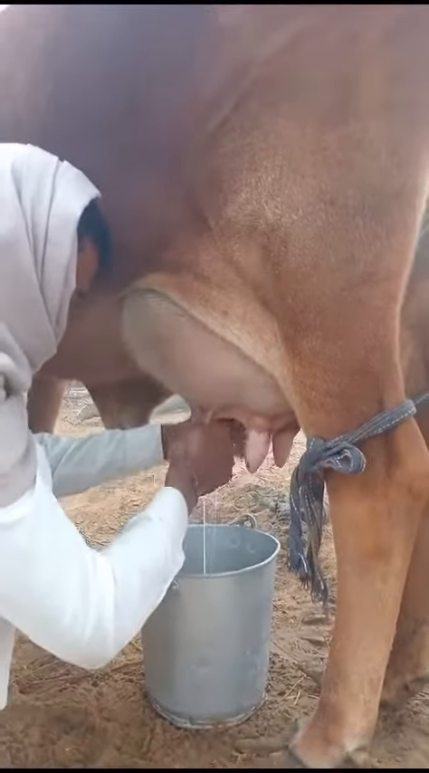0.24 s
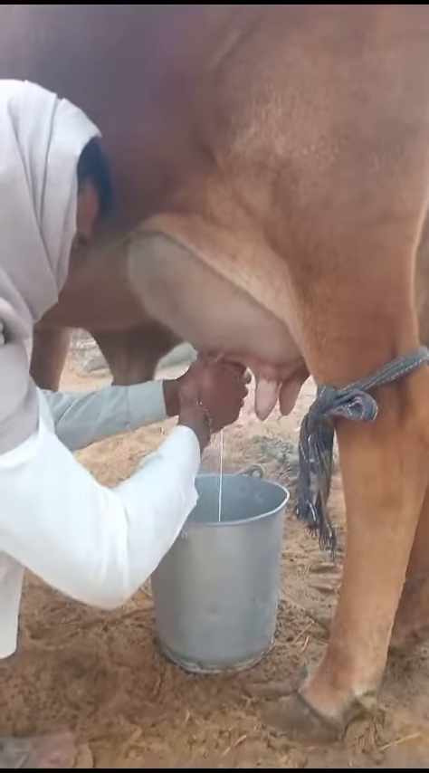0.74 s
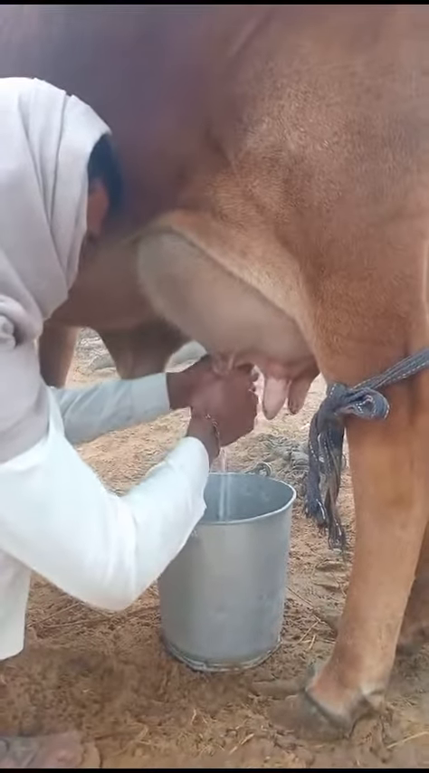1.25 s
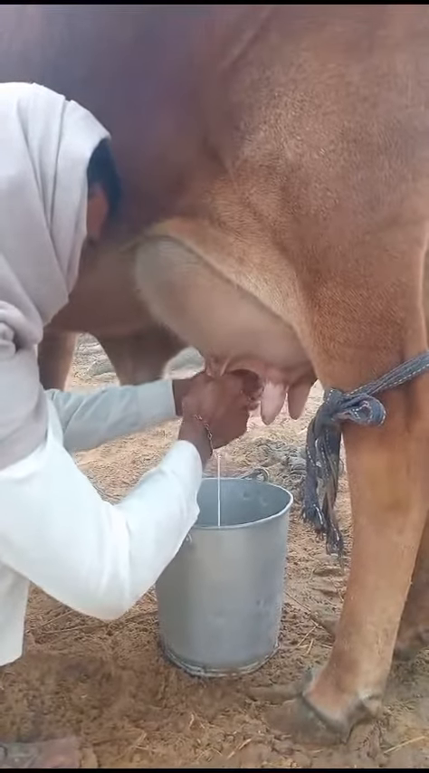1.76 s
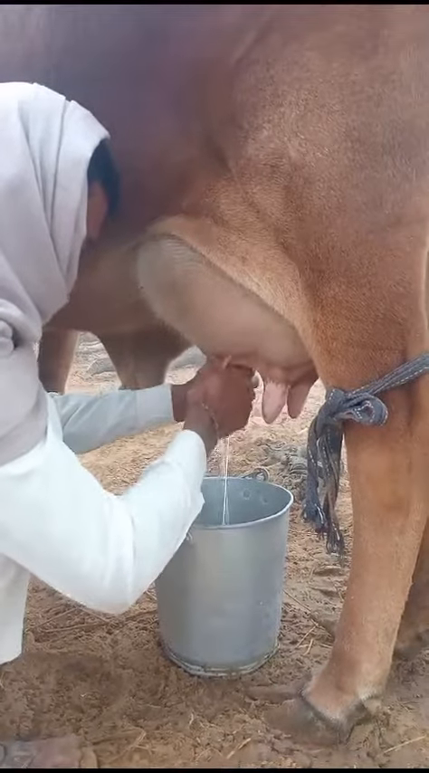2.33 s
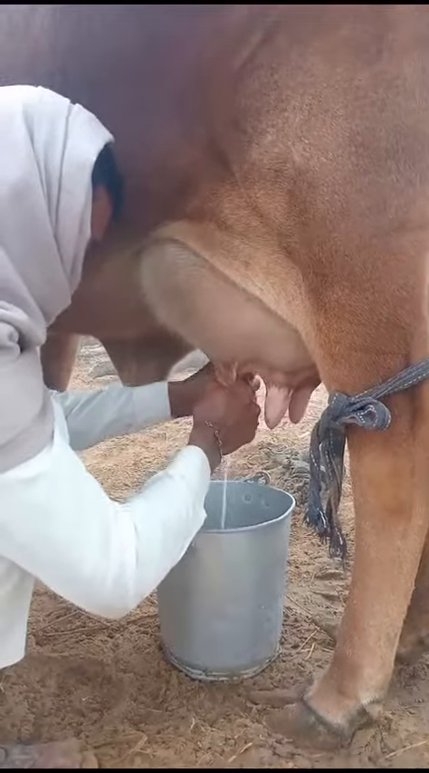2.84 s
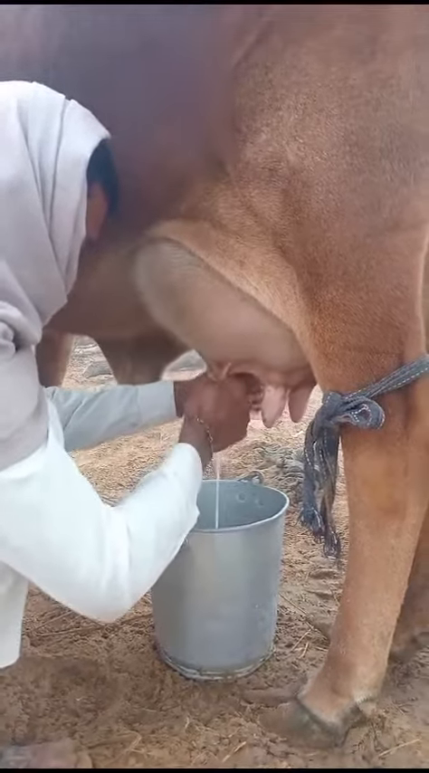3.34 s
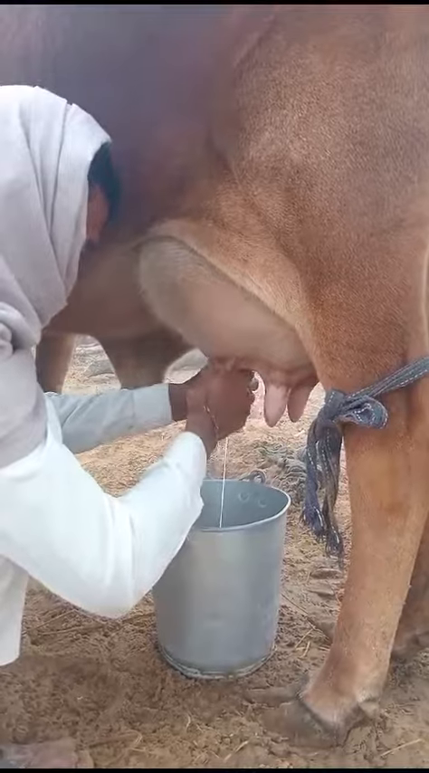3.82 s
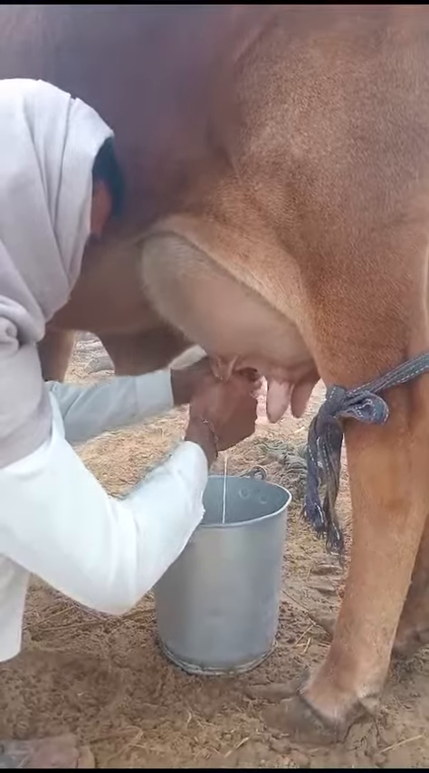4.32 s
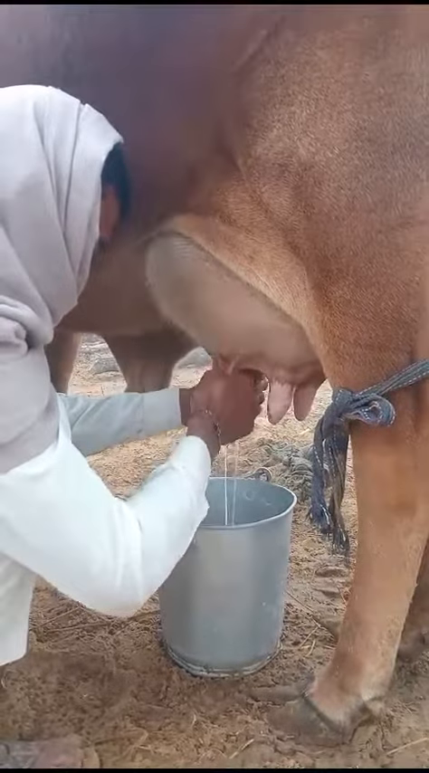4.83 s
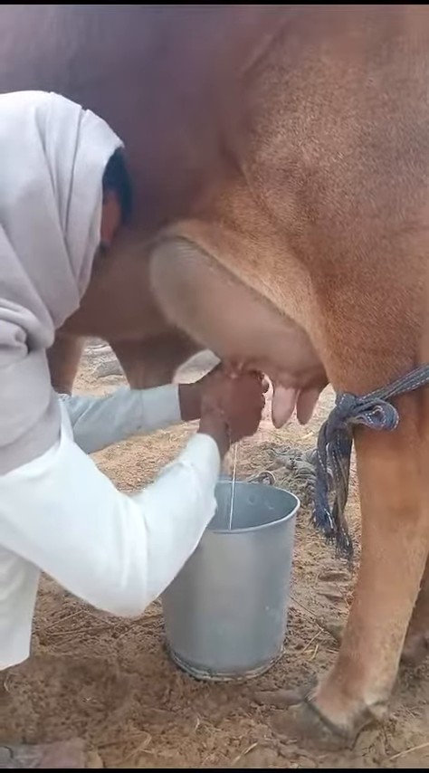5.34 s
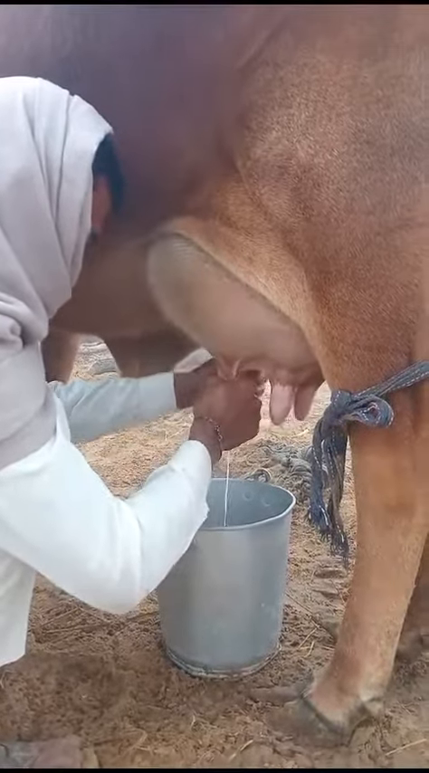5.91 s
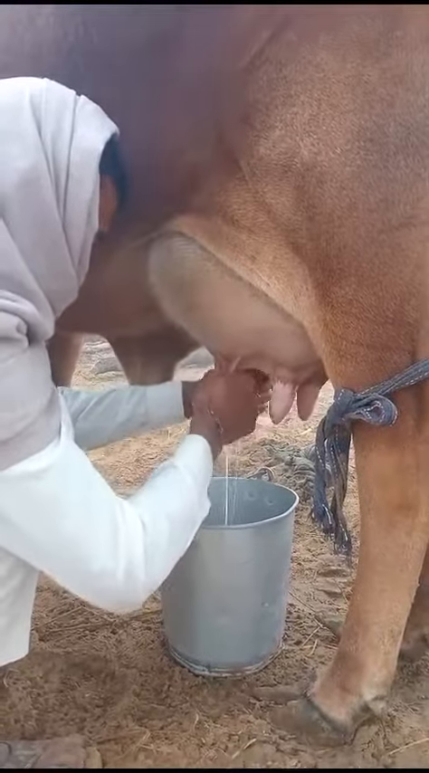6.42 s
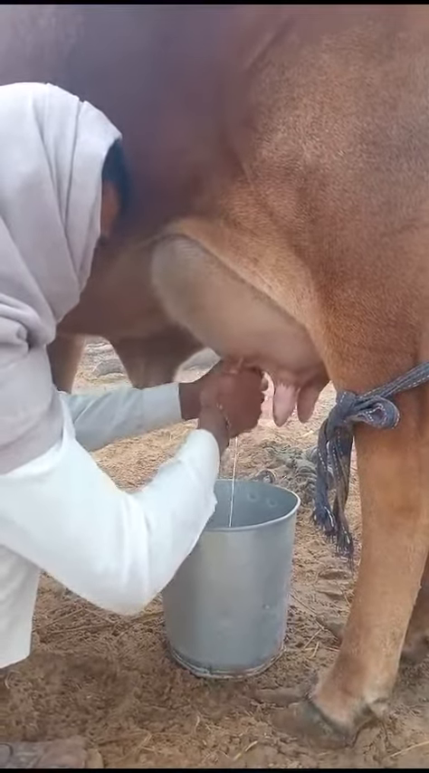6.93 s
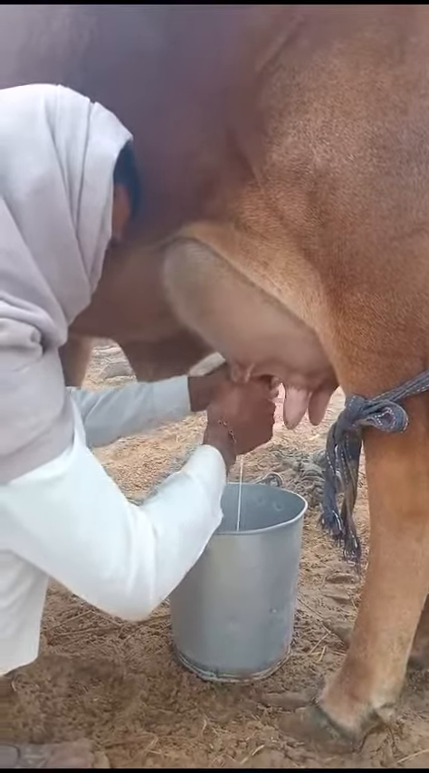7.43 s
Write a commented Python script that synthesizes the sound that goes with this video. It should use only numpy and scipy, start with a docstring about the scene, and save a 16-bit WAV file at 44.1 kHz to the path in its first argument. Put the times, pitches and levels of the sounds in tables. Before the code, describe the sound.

Streams of milk from a cow shoot into a metal bucket in quick, uneven squirts, several each second. Each breaks into a wet, bright patter with a slight metallic ring, while trapped air gulps and hums low in the pail. Small sharp splats poke through. The squirting continues throughout without a real pause. Close microphone in an open, dry yard, with very faint distant rumble and soft murmur.

```python
"""An open yard with a far rumble and a faint murmur: milk jets plunge into the froth of a metal bucket.
The broken jet patters as random drops that ring the bucket's notes, from a gurgle up to a fine spray.
Deep plunges drag air under and make the air over the milk hum and slosh.
Single splats are short noise bursts; gulps of trapped air are low notes that swell and die away."""
import sys
import numpy as np
from scipy import signal
from scipy.fft import rfft, irfft, next_fast_len
from scipy.io import wavfile

SR = 44100
rng = np.random.default_rng(int(sys.argv[2]) if len(sys.argv) > 2 else 0)


def transcribe(signal):
    """Save signal, clipped to [-1, 1], as a 16-bit WAV file at the path in sys.argv[1]."""
    frames = np.atleast_2d(signal).T
    limited = np.clip(frames, -1, 1)
    pcm = np.round(limited * 32767).astype(np.int16)
    wavfile.write(sys.argv[1], SR, pcm)


N = 338247


def from_db(db):
    """Turns a level in dB into a gain."""
    return 10 ** (np.asarray(db) / 20)


def rms_one(x):
    """Scales a sound to an average (rms) strength of 1."""
    return x / np.sqrt(np.mean(x ** 2) + 1e-20)


def resonate(x, hz, width):
    """Lets x ring one note, as a struck object does: a narrow filter with gain 1 at its peak."""
    r = np.exp(-np.pi * width / SR)
    top = np.array([1, 0, -1]) * (1 - r * r) / 2
    return signal.lfilter(top, [1, -2 * r * np.cos(2 * np.pi * hz / SR), r * r], x)


def coloured(x, spectrum):
    """Boosts and cuts the pitches of x along a curve of (f/Hz, level/dB) points; rms 1."""
    hz, level_db = np.transpose(spectrum)
    size = next_fast_len(N)
    grid = np.fft.rfftfreq(size, 1 / SR) + 1  # +1 avoids log(0)
    gain = from_db(np.interp(np.log(grid), np.log(hz), level_db))
    return rms_one(irfft(rfft(x, size) * gain, size)[:N])


def wander(spread_db, rate):
    """A gain that drifts at random: smoothed noise read as dB; a higher rate (Hz) drifts faster."""
    step = 40  # samples between noise values
    r = np.exp(-2 * np.pi * rate * step / SR)
    noise = rng.standard_normal(N // step + 1002)
    slow = signal.lfilter([1], [1, -2 * r, r * r], noise)[1000:]  # skip the filter's start
    gain = from_db(spread_db * rms_one(slow))
    return np.interp(np.arange(N) / step, np.arange(len(slow)), gain)


def drops(spread_db, count):
    """Single clicks at random moments, with very uneven sizes, as droplets land; rms 1."""
    sizes = from_db(spread_db * np.minimum(rng.exponential(1, count), 5))
    signed = sizes * rng.choice([-1, 1], count)
    return rms_one(np.bincount(rng.integers(0, N, count), signed, N) + 1e-9)


def ring_notes(modes, spread_db, wander_db, wander_rate, big_drops=0):
    """Random clicks ring each note, which swells and fades by itself; big drops strike all at once."""
    out = 0
    for hz, width, level_db in modes:
        blows = drops(spread_db, count=30000) * wander(wander_db, wander_rate) + big_drops
        # two filters in a row give steeper sides
        note = resonate(resonate(blows, hz, 1.28 * width), hz, 1.28 * width)
        out = out + from_db(level_db) * note
    return rms_one(out)


def swell_db(starts, holds, levels_db, rest_db, attack_s, release_s):
    """Level over time of events that rise, hold and fall back; their power adds to a resting level."""
    t = np.arange(0, N + 100, 100) / SR
    early = np.maximum(starts[:, None] - t, 0)
    late = np.maximum(t - (starts + holds)[:, None], 0)
    shape = np.exp(-(early / attack_s) ** 2 - (late / release_s) ** 2)
    gains = from_db(levels_db)[:, None] * shape
    power = from_db(rest_db) ** 2 + np.sum(gains ** 2, axis=0)
    return np.interp(np.arange(N) / SR, t, 10 * np.log10(power))


# slow drift of the yard: t/s, murmur level/dB, far rumble level/dB
YARD_DRIFT = [(0, -57, -64), (1, -60, -67.5), (2, -59.5, -66.5), (2.7, -60, -67.5), (3.3, -58.5, -68),
              (4.8, -58.5, -66), (6.4, -62, -65.5), (7.67, -61, -67)]


def yard_levels():
    """The murmur and the rumble slide slowly from one level to the next (dB)."""
    s, *levels = np.transpose(YARD_DRIFT)
    return [np.interp(np.arange(N) / SR, s, level) for level in levels]


# tone of the far rumble: f/Hz, level/dB per Hz (relative)
YARD_TONE = [(15, -52), (25, -32), (66, -5.5), (101, 0), (124, -0.5), (151, -7.5), (182, -13), (240, -9.5),
             (310, -14), (530, -120)]


def yard_rumble(level_db):
    """Far rumble: low noise whose strength wanders."""
    return from_db(level_db) * wander(1.7, 4.7) * coloured(rng.standard_normal(N), YARD_TONE)


# low notes of the yard's murmur: f/Hz, nominal width/Hz, level/dB (relative)
MURMUR_NOTES = [(405.5, 150, -0.5), (502.3, 18, 2.5), (615, 102, -2.5)]


def yard_murmur(level_db):
    """A faint murmur of the yard on a few low notes, with no surges."""
    return from_db(level_db) * ring_notes(MURMUR_NOTES, 2.5, 2, 6)


# a jet plunges deep and drags air under: t/s, hold t/s, hum level/dB, slosh level/dB
PLUNGE_EVENTS = [(-0, 0.0041, -37, -58), (0.127, 0.018, -45.5, -53.5), (0.354, 0.11, -50, -61),
                 (0.727, 0.17, -43.5, -56.5), (1.044, 0.002, -44.1, -81.1), (1.304, 0.015, -46.5, -57),
                 (1.469, 0.16, -46, -51), (1.86, 0.002, -43, -65), (2.124, 0.002, -44.1, -63),
                 (2.277, 0.16, -44.6, -52.5), (2.855, 0.059, -47.2, -82), (3.045, 0.21, -42, -52),
                 (3.4, 0.34, -46.5, -61.5), (3.834, 0.24, -45.5, -58.5), (4.225, 0.12, -47.5, -55.5),
                 (4.456, 0.0063, -42.5, -81), (4.631, 0.002, -41, -69), (4.74, 0.087, -47.5, -57),
                 (5.008, 0.18, -42, -64), (5.413, 0.26, -45.3, -57.5), (5.787, 0.069, -45, -80.8),
                 (5.96, 0.11, -47, -56), (6.188, 0.074, -43, -77), (6.326, 0.045, -50, -54.5),
                 (6.633, 0.045, -39.5, -59), (6.83, 0.35, -43.5, -62), (7.323, 0.21, -44, -59.5)]
PLUNGE_ATTACK_S, PLUNGE_RELEASE_S = 0.039, 0.063
HUM_REST_DB, SLOSH_REST_DB = -53, -61.5  # between plunges


def plunge_levels():
    """Each plunge lifts the hum and the slosh together, each by its own amount (dB)."""
    s, hold, *levels = np.transpose(PLUNGE_EVENTS)
    return [swell_db(s, hold, level_db, rest_db, PLUNGE_ATTACK_S, PLUNGE_RELEASE_S)
            for level_db, rest_db in zip(levels, [HUM_REST_DB, SLOSH_REST_DB])]


# lowest notes of the air over the milk: f/Hz, nominal width/Hz, level/dB (relative)
HUM_NOTES = [(327.6, 46, 3.5), (310.5, 43, -9), (359, 33.5, -3.5)]


def hum(level_db):
    """The air over the milk hums; this lowest note stops sharply on its upper side."""
    steep = signal.cheby2(4, 24, 430, fs=SR, output="sos")
    air = ring_notes(HUM_NOTES, 1.5, 0.77, 19.0)
    return from_db(level_db) * rms_one(signal.sosfilt(steep, air))


# next notes of the air over the milk: f/Hz, nominal width/Hz, level/dB (relative)
SLOSH_NOTES = [(782.7, 60, 0.9), (871, 154, -3.5)]


def slosh(level_db):
    """The plunges also ring the next, higher notes of the air over the milk."""
    return from_db(level_db) * ring_notes(SLOSH_NOTES, 4.35, 2.9, 9.9)


# gulps of air that boom in the bucket: t/s, swell level/dB, f/Hz, nominal length t/s
AIR_GULPS = [(0.311, -41, 305, 0.023), (0.671, -37.5, 323, 0.039), (0.767, -38, 313, 0.072),
             (1.273, -42, 322, 0.034), (2.222, -37, 322, 0.04), (3.042, -28.5, 321, 0.04),
             (3.63, -43, 341, 0.11), (3.889, -34, 328, 0.058), (3.979, -31.5, 327, 0.044),
             (4.319, -33, 302, 0.1), (4.729, -37.5, 328, 0.14), (4.869, -40, 329, 0.065),
             (5.125, -31, 317.7, 0.093), (5.252, -36, 344, 0.044), (5.49, -33.5, 307, 0.064),
             (5.632, -44, 300, 0.023), (6.032, -36, 318.3, 0.11), (6.173, -35.5, 308, 0.024),
             (6.543, -36.5, 313, 0.021), (6.625, -39, 321, 0.054), (6.867, -43, 309, 0.045),
             (6.992, -39, 284, 0.051), (7.241, -41.5, 324, 0.031), (7.302, -32, 307, 0.036),
             (7.389, -37.5, 309, 0.09), (7.58, -32, 286, 0.029)]


def gulps():
    """Each pocket of air is a pure tone that swells and dies away near the bucket's lowest note."""
    t = np.arange(8000) / SR
    out = np.zeros(N + len(t))
    for s, peak_db, hz, length in AIR_GULPS:
        u = t / (0.26 * max(length, .01))  # the swell peaks at u = 1
        swell = (u * np.exp(1 - u)) ** 2
        at = round(s * SR)
        out[at:at + len(t)] += from_db(peak_db) * swell * np.sin(2 * np.pi * hz * t)
    return out[:N]


# surges of spatter as a jet breaks up on the froth: t/s, hold t/s, patter level/dB,
# then measured against the patter: spray level/dB, churn level/dB, ring level/dB, gurgle level/dB
SPATTER_SURGES = [(-0.005, 0.019, -48, -12.5, 0.5, 0, -5), (0.07, 0.083, -55.5, -13.5, -1, 4, -1),
                  (0.195, 0.096, -50, -13.5, -2.5, -0.5, -5.7), (0.36, 0.1, -54.5, -14.5, 3, 2.5, -3),
                  (0.575, 0.037, -52.5, -9.5, -0.4, -1.2, 1), (0.671, 0.0089, -47.5, -16.5, 0, -2, -6.5),
                  (0.739, 0.29, -57, -11.5, -1.5, 1.7, -5), (1.046, 0.082, -62, -33, 8, -4, 2),
                  (1.215, 0.1, -56.5, -20, 1.6, -0.6, -3.5), (1.4, 0.029, -51.5, -15.4, -2.5, 1.7, -3.5),
                  (1.52, 0.29, -57, -10, -0.4, 1.7, -11), (1.819, 0.087, -51.5, -22, 4, -4.5, -7),
                  (1.96, 0.062, -59.3, -31, 2.7, 1.5, -2), (2.171, 0.02, -49.5, -17, 1, -3.5, -3),
                  (2.246, 0.056, -63.5, -5, 10, 8.5, -0.8), (2.383, 0.091, -56, -9, -4, 2.5, 0),
                  (2.554, 0.008, -52, -15, 2, 0, -3.5), (2.647, 0.14, -54, -17, 6, -2.3, -4.5),
                  (2.942, 0.2, -52.5, -13, -1.5, 1.8, -3.5), (3.278, 0.084, -53, -9.5, -1.4, 3, -6.9),
                  (3.436, 0.077, -51, -13.8, 5.5, -2.6, -4.8), (3.556, 0.068, -49.5, -13, -4, -6, -7),
                  (3.779, 0.032, -51, -11, -7.5, 0, -8), (3.895, 0.089, -57.5, -19, -3.3, 3.1, -4),
                  (4.077, 0.03, -58, -5, 0, 3, 3.5), (4.16, 0.0019, -50.5, -10.3, -6, -4, -17),
                  (4.246, 0.15, -52, -10.5, -2.5, -1, -3), (4.566, 0.003, -48.5, -20, -8, -3.5, -15),
                  (4.635, 0.003, -56.7, -16, -8, -1, 2), (4.76, 0.26, -59.5, -9, 0, 4.5, 2.5),
                  (4.966, 0.087, -52, -14, 3, -0.5, -6), (5.097, 0.087, -51, -13.5, -4, -2.5, -11),
                  (5.363, 0.003, -52, -14.5, -0.9, 0, -7), (5.445, 0.11, -61.5, -15, -1, 6, -13),
                  (5.672, 0.071, -56.5, -7, 2, 3, 1), (5.761, 0.079, -49, -17, 5.5, -3.2, -8),
                  (5.923, 0.066, -57, -10, 1.5, -13, -5), (6.122, 0.019, -50, -16.5, -0.5, -1, -2),
                  (6.326, 0.17, -65, -8.5, -20, -2, 2), (6.516, 0.004, -50.5, -16.0, 4.5, 0, -2.3),
                  (6.615, 0.052, -55, -17, 0, -4, -2.9), (6.876, 0.0099, -55.5, -18, 2.5, -4, -3),
                  (7.125, 0.15, -59, -12.5, -15.1, -2, -4), (7.253, 0.025, -52.5, -15.5, -6, -5, -9),
                  (7.367, 0.14, -52.5, -15, 0, -2, -10), (7.633, 0.007, -51.5, -14.5, -4, -4, -3)]
SURGE_ATTACK_S, SURGE_RELEASE_S = 0.035, 0.045
# between surges:
PATTER_REST_DB, SPRAY_REST_DB, CHURN_REST_DB, RING_REST_DB, GURGLE_REST_DB = -61, -75, -61.5, -62, -61.5


def surge_levels():
    """Each surge lifts patter, spray, churn, ring and gurgle together, before the flutter (dB)."""
    s, hold, patter_db, *against = np.transpose(SPATTER_SURGES)
    rests = [PATTER_REST_DB, SPRAY_REST_DB, CHURN_REST_DB, RING_REST_DB, GURGLE_REST_DB]
    return [swell_db(s, hold, patter_db + more_db, rest_db, SURGE_ATTACK_S, SURGE_RELEASE_S)
            for more_db, rest_db in zip([0] + against, rests)]


# gurgling notes: f/Hz, nominal width/Hz, level/dB (relative)
GURGLE_NOTES = [(1049, 104, -3.5), (1180, 132, -3.5)]


def gurgle(level_db, flutter):
    """Droplets ring the lowest notes of the spatter."""
    return from_db(level_db) * flutter ** 0.74 * ring_notes(GURGLE_NOTES, 1.7, 2.1, 21.0)


# churning notes: f/Hz, nominal width/Hz, level/dB (relative)
CHURN_NOTES = [(1591, 203, 0), (1757, 115, 0), (1913, 116, 0.011)]


def churn(level_db, flutter, big):
    """Small and big drops ring the notes above the gurgle."""
    return from_db(level_db) * flutter ** 0.63 * ring_notes(CHURN_NOTES, 2.6, 2.8, 24, 0.28 * big)


# ringing notes of the bucket: f/Hz, nominal width/Hz, level/dB (relative)
RING_NOTES = [(2208, 220, 1.5), (2513, 150, -1), (2691, 110, 0)]


def ring(level_db, flutter, big):
    """Small and big drops set the bucket ringing."""
    return from_db(level_db) * flutter ** 1.06 * ring_notes(RING_NOTES, 3.8, 3.75, 25, 0.73 * big)


def wall_ring(x, width, wander_db, wander_rate, count):
    """The thin wall has dense, uneven high notes that light up at random, each by itself."""
    pitches = np.linspace(4900, 15700, count) + rng.normal(0, 40, count)
    return sum(wander(wander_db, wander_rate) * resonate(x, hz, width) for hz in pitches)


# tone curve laid over the spray: f/Hz, level/dB (relative)
SPRAY_TONE = [(2880, -8), (4900, -9.5), (5260, -7), (6160, -4), (6940, -8), (10800, -9), (12500, -11.5),
              (15300, -10.5)]


def spray(level_db, flutter):
    """A mist of fine drops rings the thin wall, giving a bright fizz."""
    mist = wall_ring(drops(3.2, count=100000), 110, 5.7, 10.0, count=62)
    return from_db(level_db) * flutter ** 1.5 * coloured(mist, SPRAY_TONE)


# pattering notes: f/Hz, nominal width/Hz, level/dB (relative)
PATTER_NOTES = [(3006, 294, 2.5), (3334, 84, 4), (3606, 185, 3), (4014, 267, 2), (4450, 196, -2)]


def patter(level_db, flutter, big):
    """The broken jet patters on the surface: small and big drops ring high notes."""
    return from_db(level_db) * flutter ** 0.91 * ring_notes(PATTER_NOTES, 3.15, 4.0, 10.2, 0.6 * big)


# single loud splats: t/s, peak level/dB, f/Hz
LOUD_SPLATS = [(0.078, -35.5, 2650), (0.207, -35, 3820), (0.273, -33, 1940), (0.302, -33.5, 4300),
               (0.352, -36, 1880), (0.443, -40, 2050), (0.67, -37, 4400), (0.863, -38, 2270),
               (0.9403, -40, 2300), (0.979, -38, 2250), (1.2146, -36, 1520), (1.394, -38, 1860),
               (1.4359, -27, 2180), (1.603, -38, 2280), (1.723, -33.5, 2240), (2.1686, -35.5, 1850),
               (2.2687, -34.5, 2210), (2.5598, -34, 2240), (2.664, -35, 1600), (2.929, -35, 1590),
               (3.1816, -38, 2620), (3.2196, -38.5, 2220), (3.3538, -29.5, 2300), (3.501, -46, 1700),
               (3.641, -37.5, 3600), (3.735, -33.5, 1920), (3.759, -38, 1870), (4.1138, -33, 1140),
               (4.156, -30, 2300), (4.166, -34.5, 3540), (4.211, -35.5, 1520), (4.528, -43, 1900),
               (4.5549, -34.5, 1820), (4.722, -40, 2180), (4.834, -38, 2240), (4.868, -37, 1200),
               (5.003, -35, 1670), (5.086, -32, 2770), (5.365, -36, 1190), (5.573, -44, 2260),
               (5.6295, -39.5, 2190), (5.746, -35, 1720), (5.7937, -30.5, 1740), (5.843, -43, 1740),
               (6.077, -40.5, 1140), (6.106, -44, 1140), (6.491, -34.5, 1730), (6.851, -37.5, 2650),
               (6.896, -32, 1880), (7.418, -36.5, 2650), (7.6163, -54, 1910)]
SPLAT_RISE_S, SPLAT_S = 0.001, 0.009  # rise time; time by which the burst has faded to about a third


def splats():
    """A short noise burst rings its own pitch and cracks through the bucket's notes; froth dulls it."""
    t = np.arange(2000) / SR
    out = np.zeros(N + len(t))
    shape = np.minimum(t / SPLAT_RISE_S, 1) * np.exp(-(t / SPLAT_S) ** 4)
    froth = signal.ellip(4, 1, 24, [1000, 4600], "band", fs=SR, output="sos")
    for s, peak_db, hz in LOUD_SPLATS:
        burst = rng.standard_normal(len(t)) * shape
        crack = sum(from_db(level_db) * resonate(burst, note_hz, width)
                    for note_hz, width, level_db in CHURN_NOTES + RING_NOTES + PATTER_NOTES)
        sound = signal.sosfilt(froth, resonate(burst, hz, 146) + 0.12 * crack)
        at = round(s * SR)
        out[at:at + len(t)] += from_db(peak_db) * sound / np.abs(sound).max()
    return out[:N]


def scene():
    """Adds all layers; a shared flutter of the breaking jet moves the bright ones together."""
    murmur_db, rumble_db = yard_levels()
    hum_db, slosh_db = plunge_levels()
    patter_db, spray_db, churn_db, ring_db, gurgle_db = surge_levels()
    flutter = wander(0.8, 28) * wander(1.4, 72)
    big = drops(2.5, count=1500)
    yard = yard_rumble(rumble_db) + yard_murmur(murmur_db)
    low = hum(hum_db) + slosh(slosh_db) + gulps()
    bright = gurgle(gurgle_db, flutter) + churn(churn_db, flutter, big) + ring(ring_db, flutter, big)
    bright = bright + spray(spray_db, flutter) + patter(patter_db, flutter, big)
    return (yard + low + bright + splats())[None]


HISS_DB, CUTOFF_HZ = -83, 15530


def record(dry):
    """The microphone adds its steady hiss; the very top is then cut steeply."""
    hiss = from_db(HISS_DB) * rng.standard_normal(N)
    top_cut = signal.ellip(14, .5, 60, CUTOFF_HZ, fs=SR, output="sos")
    return signal.sosfilt(top_cut, dry + hiss)


dry = scene()
out = record(dry)
transcribe(out)
```